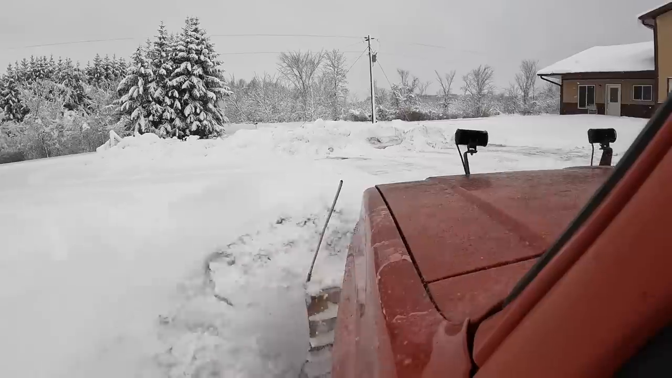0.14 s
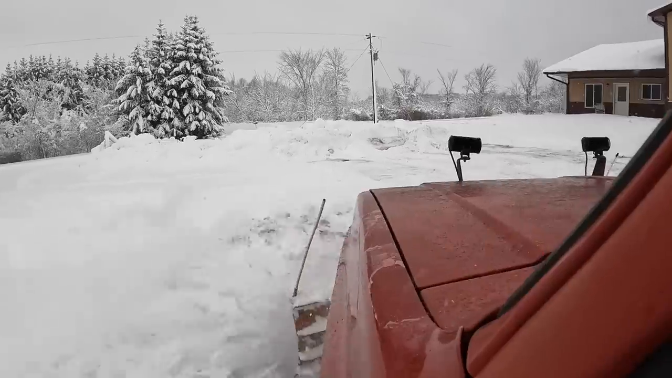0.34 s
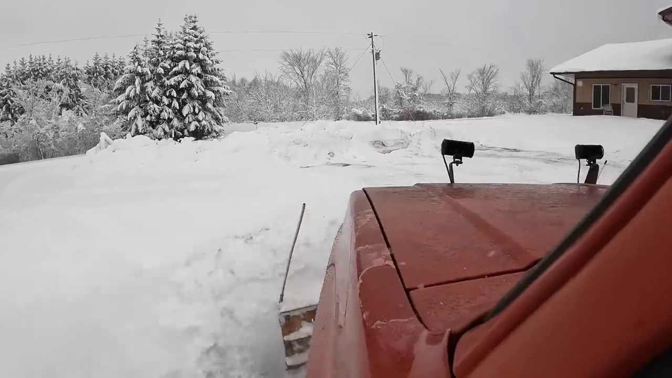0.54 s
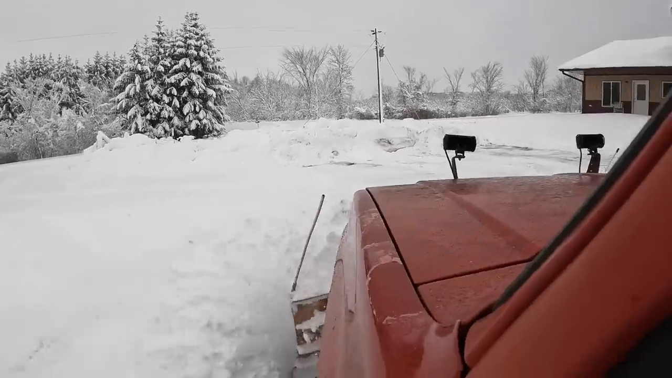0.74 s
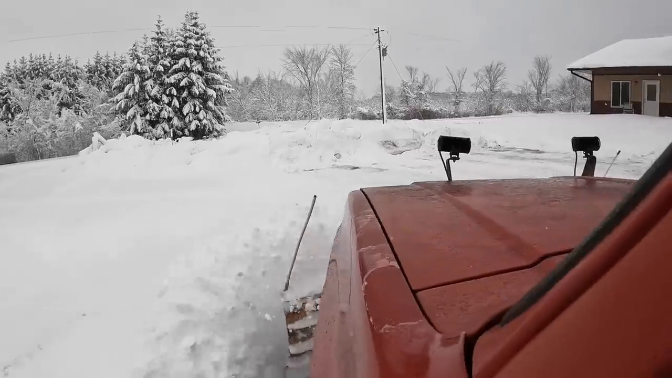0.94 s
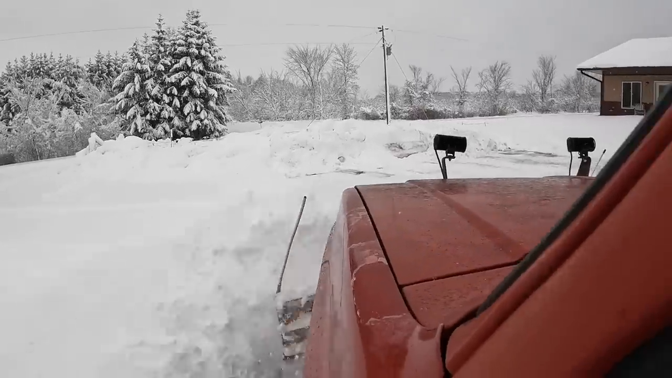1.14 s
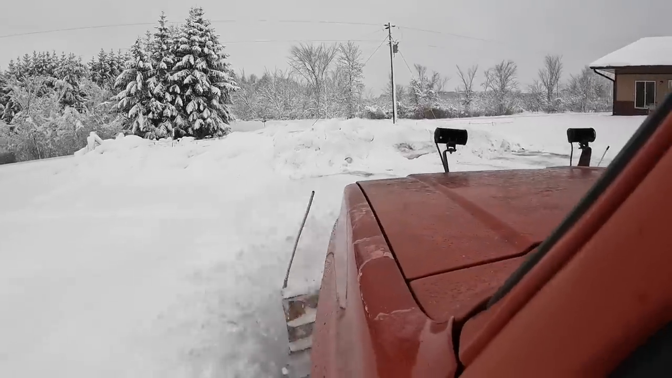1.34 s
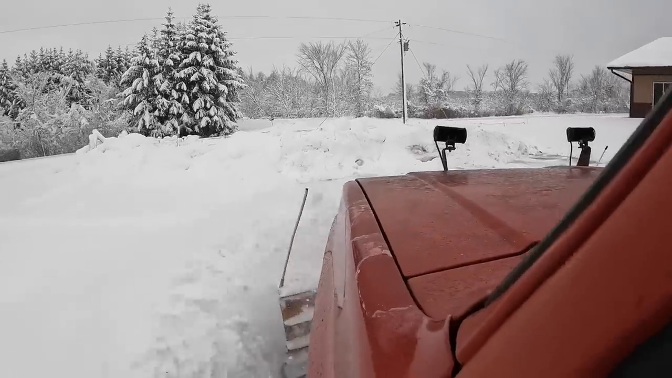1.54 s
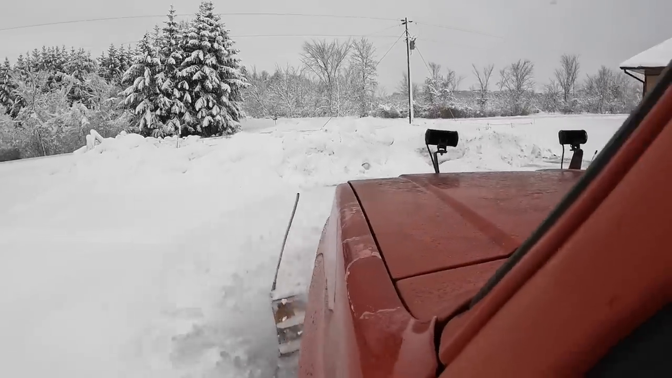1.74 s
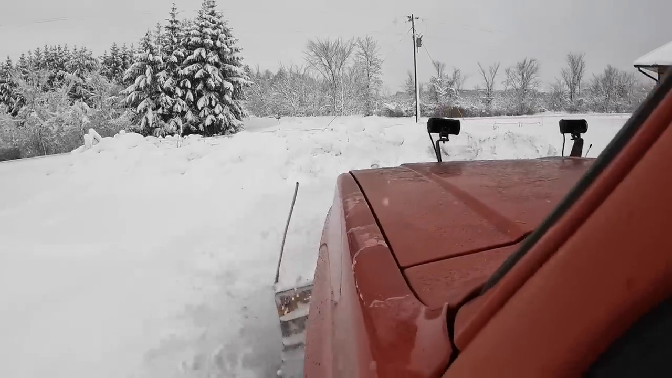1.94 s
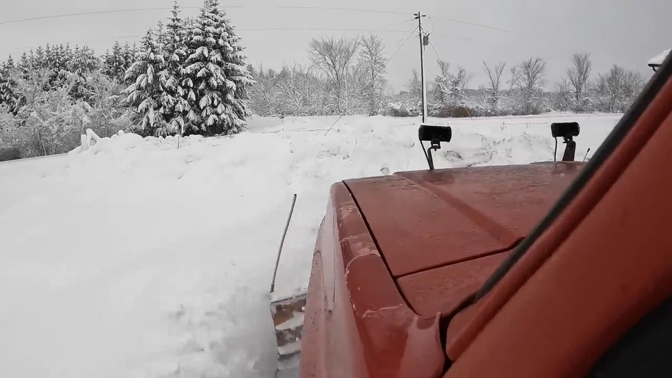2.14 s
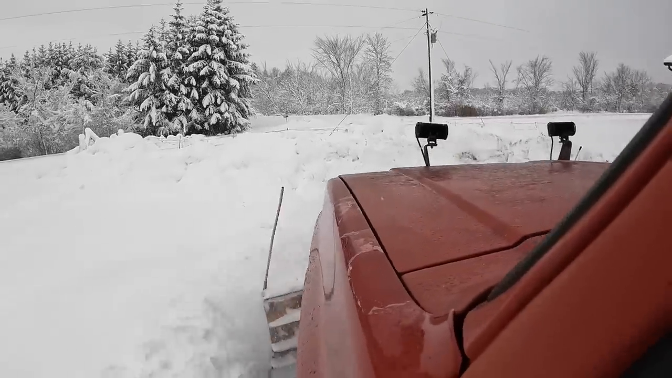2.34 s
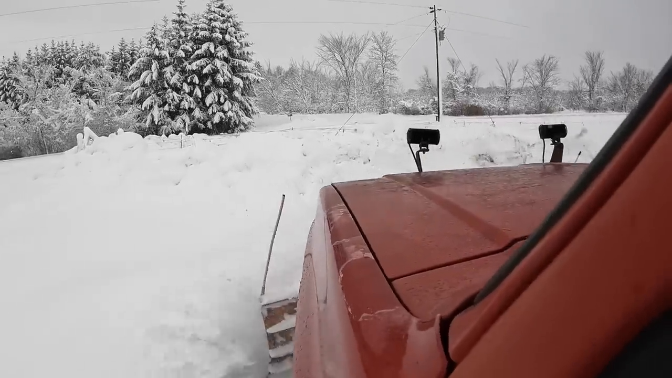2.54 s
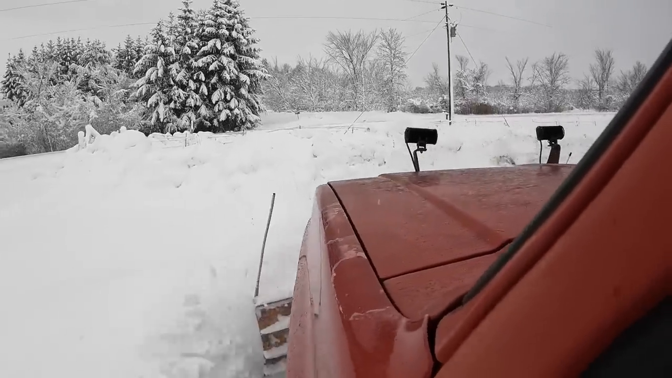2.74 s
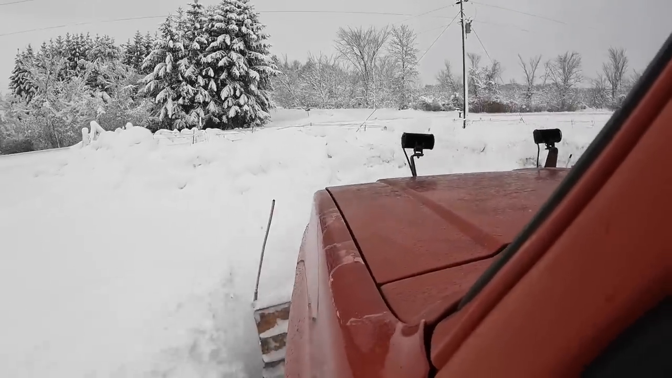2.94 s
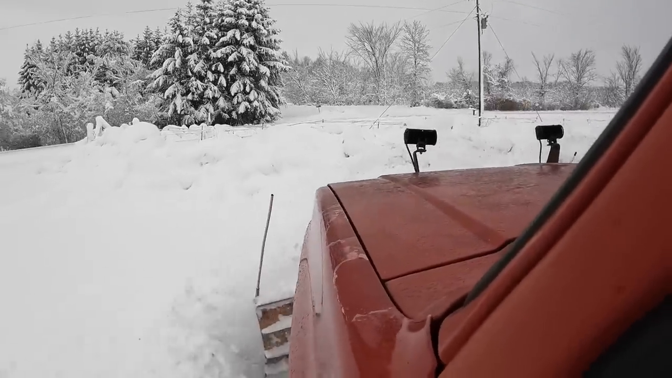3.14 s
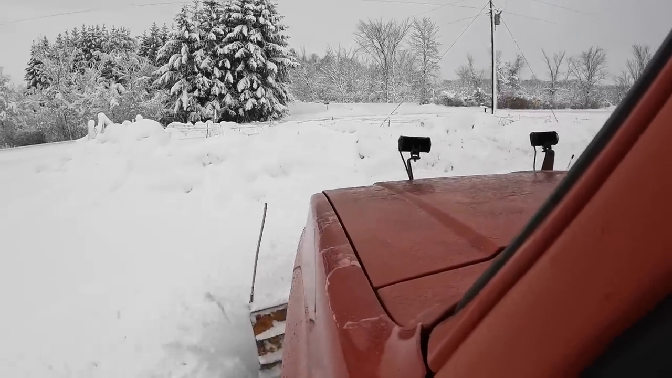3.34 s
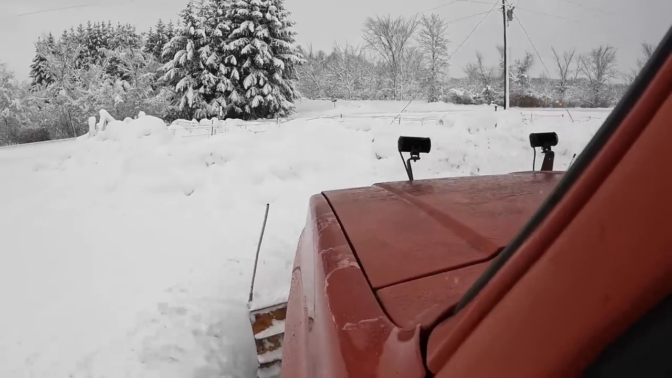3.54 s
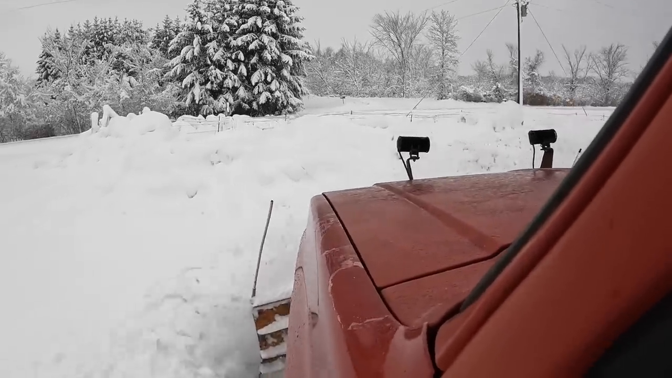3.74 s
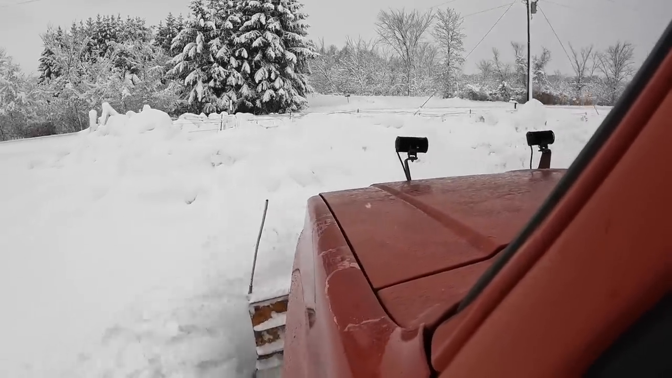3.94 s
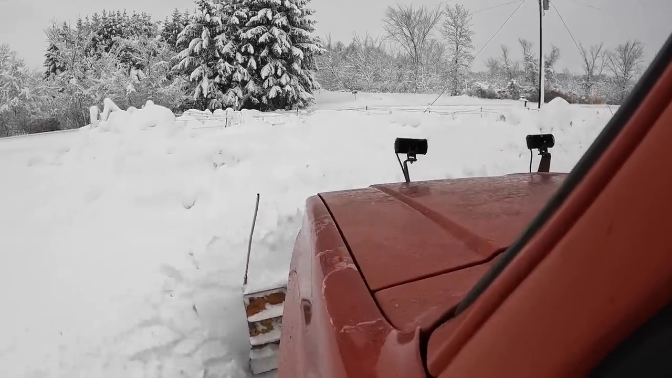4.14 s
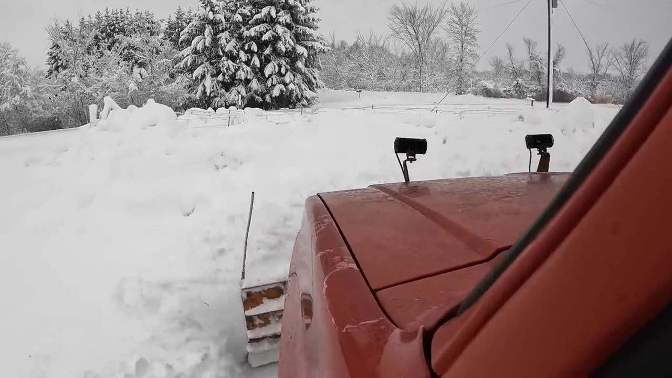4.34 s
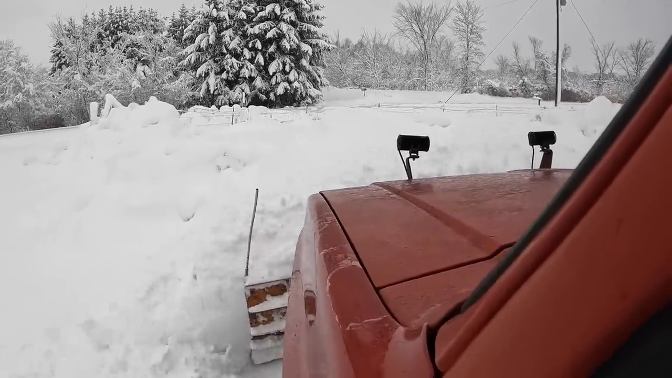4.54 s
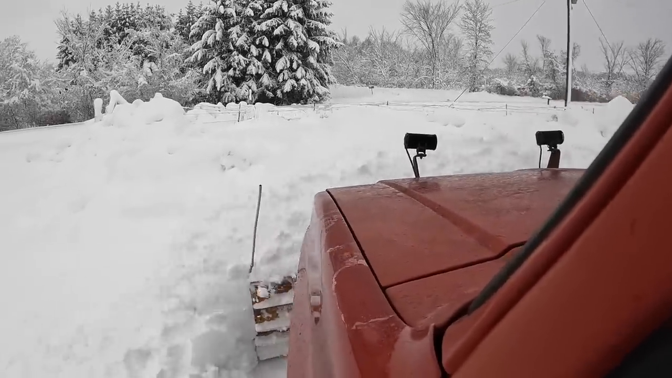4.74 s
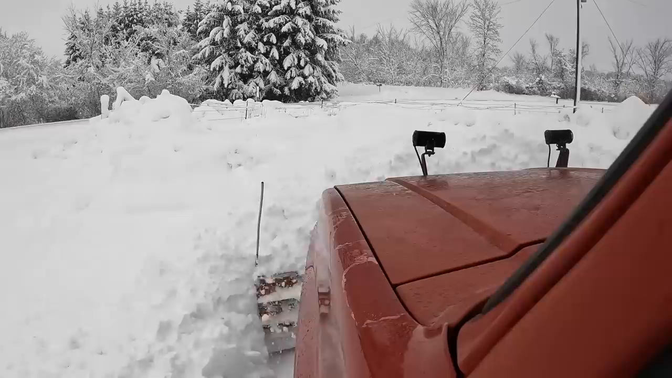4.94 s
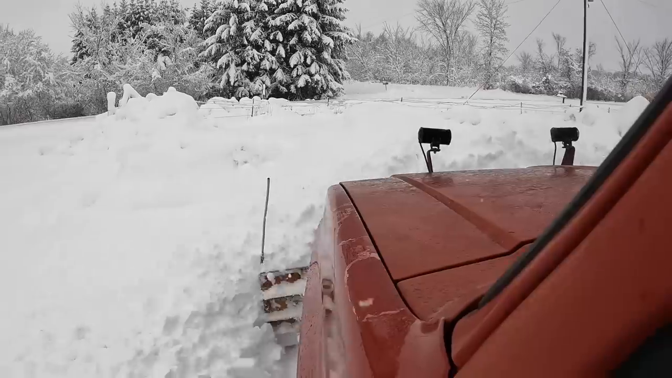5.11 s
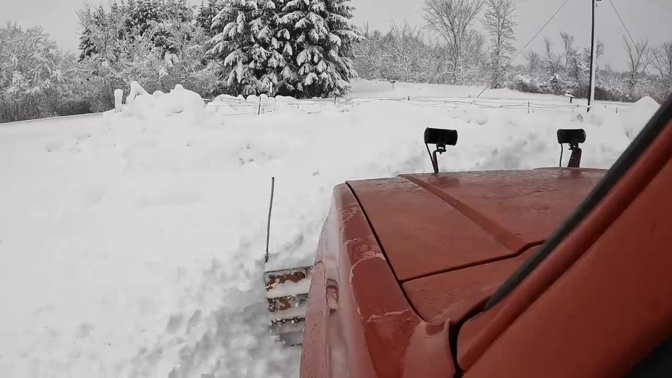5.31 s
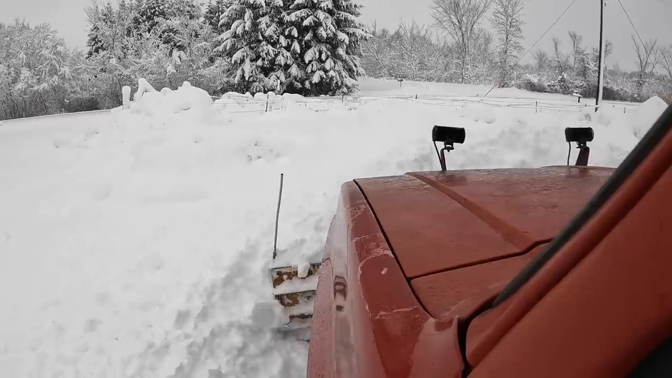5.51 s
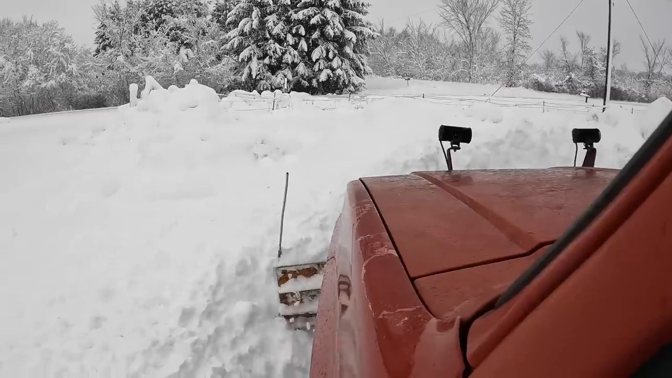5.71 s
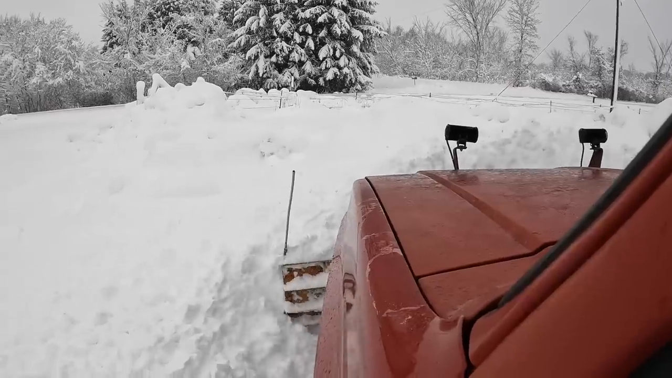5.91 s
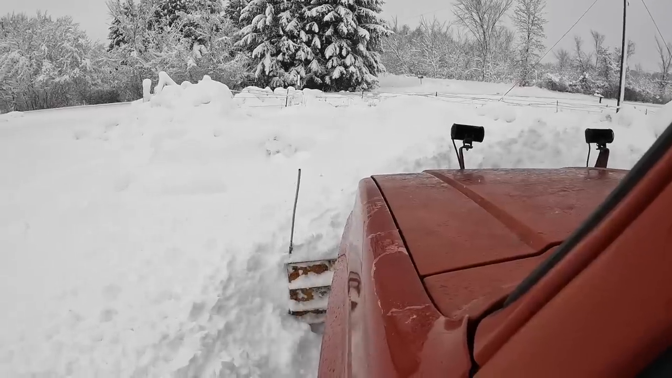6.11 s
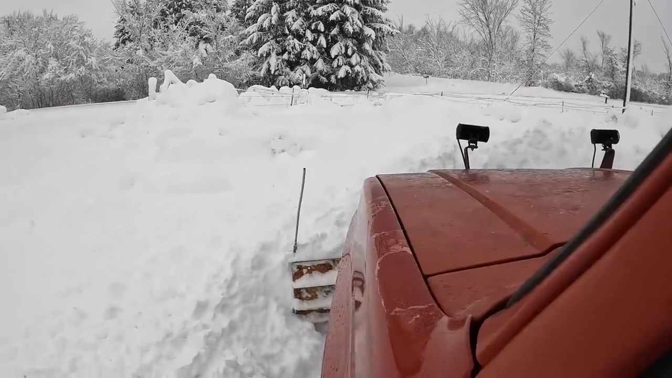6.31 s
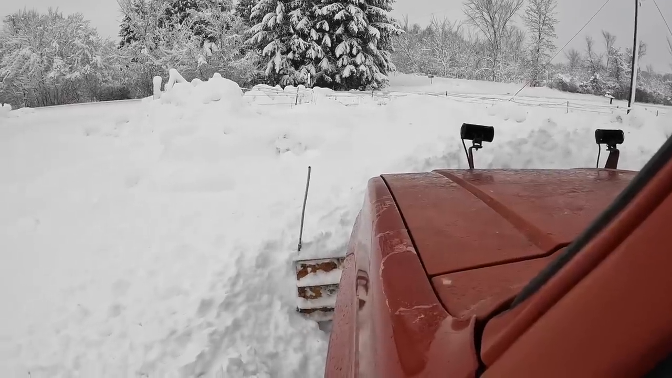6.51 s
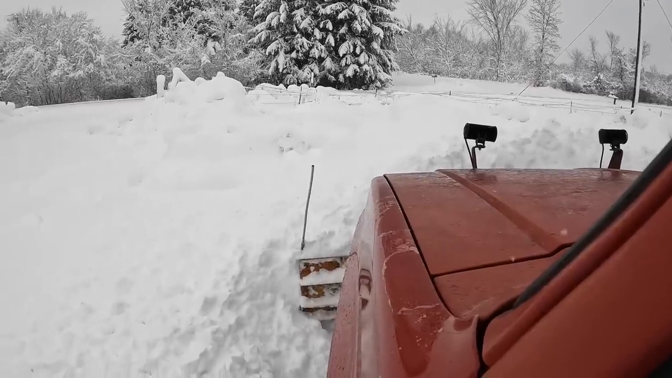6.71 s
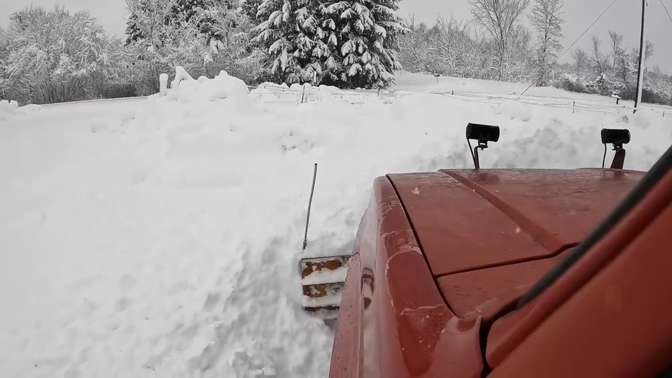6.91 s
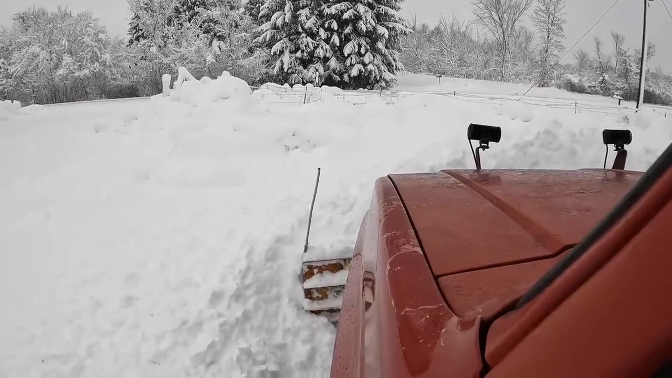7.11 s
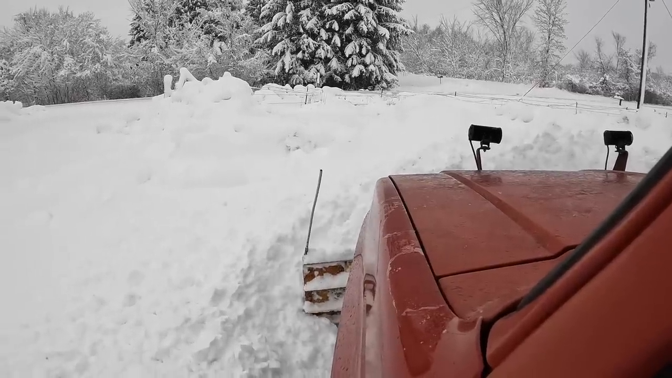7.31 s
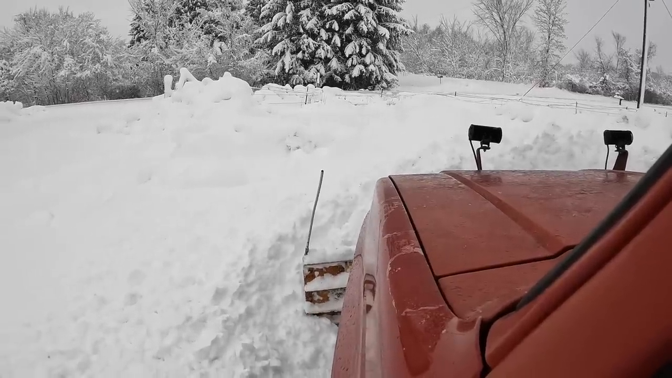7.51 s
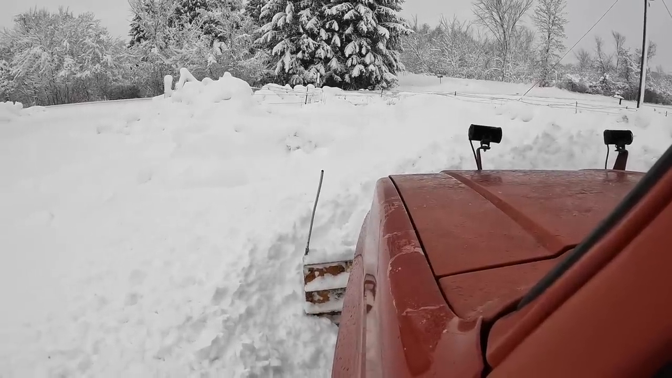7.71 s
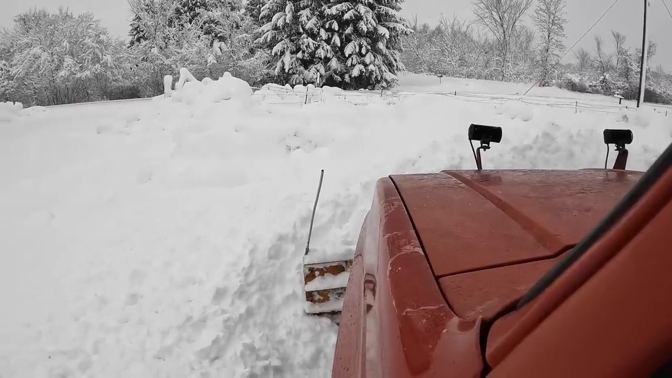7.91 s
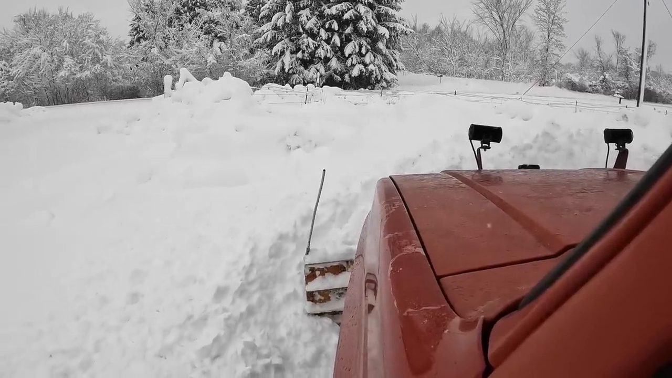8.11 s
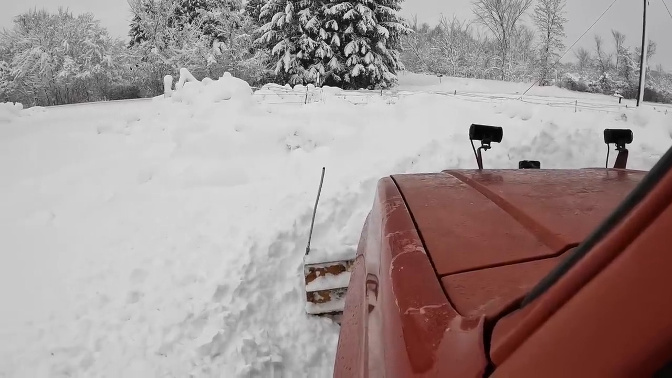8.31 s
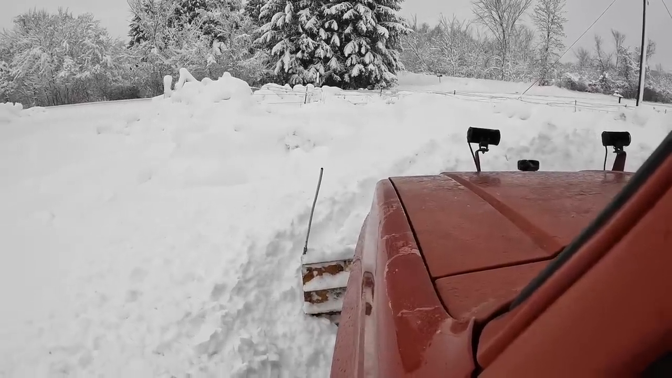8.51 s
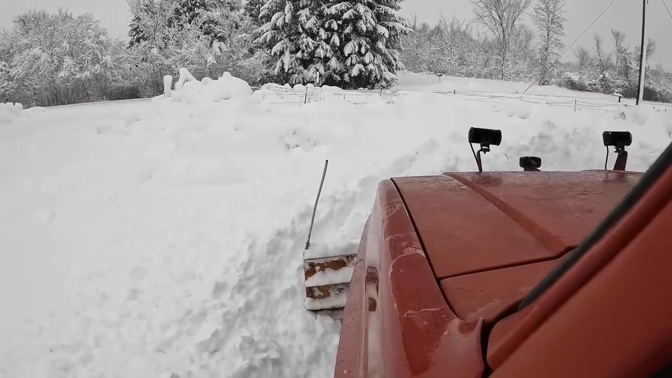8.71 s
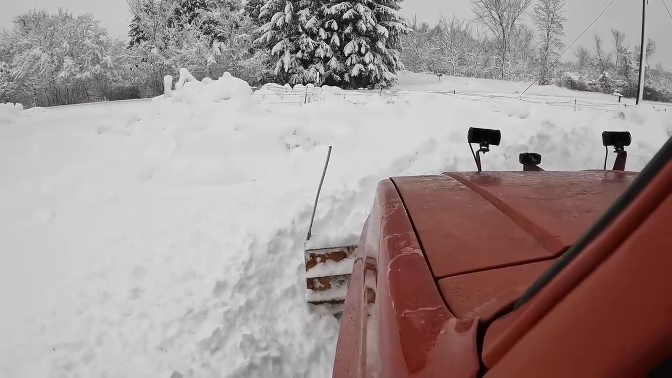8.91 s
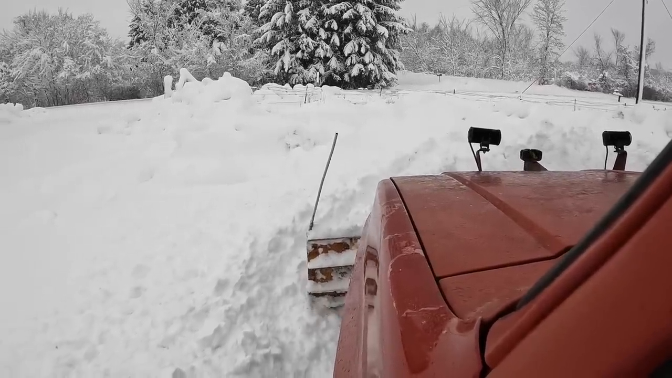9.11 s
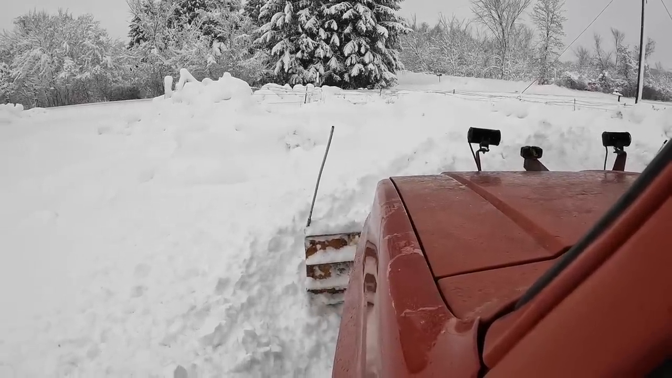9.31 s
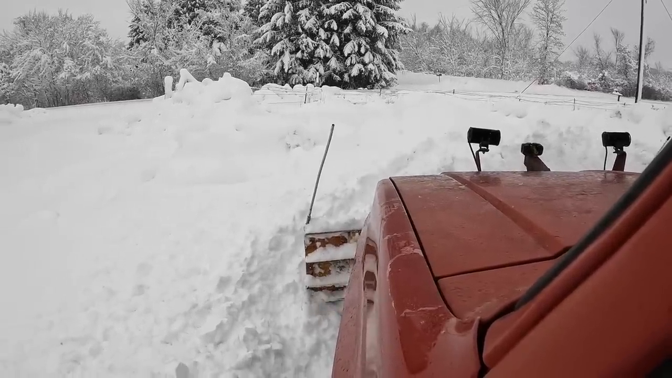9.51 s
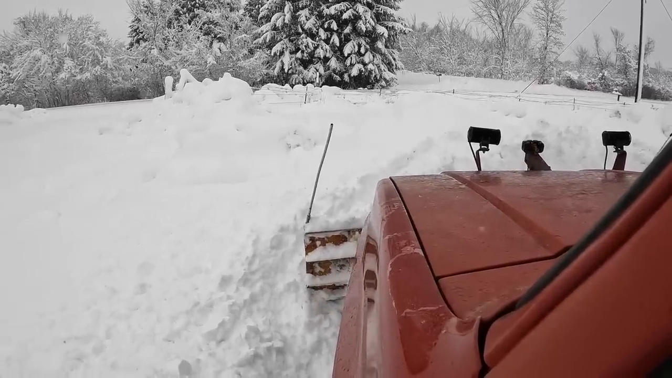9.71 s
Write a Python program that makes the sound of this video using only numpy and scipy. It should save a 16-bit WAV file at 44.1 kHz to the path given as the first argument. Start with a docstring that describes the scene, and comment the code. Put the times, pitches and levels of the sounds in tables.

```python
"""A pickup with an eight-cylinder engine shoves a plow blade through snow, heard from the side of the cab.
It pulls at speed: tones at multiples of the engine cycle over noise puffs; filtered noise rumbles and hisses
as snow on the blade, noise bursts through steel modes clank, and short ringing taps tick as a loose pin.
It slows to idle against the heap as the blade shudders, then stands and revs again with a gusty hiss.
The sound is almost mono and band-limited; late on the stereo widens and leans right."""
import sys
import numpy as np
from scipy import signal
from scipy.fft import rfft, irfft, next_fast_len
from scipy.io import wavfile
from scipy.ndimage import uniform_filter1d

SR = 44100
rng = np.random.default_rng(int(sys.argv[2]) if len(sys.argv) > 2 else 0)


def to_wav(s):
    """Save 16-bit WAV."""
    ch = np.atleast_2d(s).T  # columns
    pcm = np.round(np.clip(ch, -1, 1) * 32767)  # PCM
    wavfile.write(sys.argv[1], SR, pcm.astype(np.int16))


N = 429975
T = np.arange(N) / SR

# engine and hiss over time: time_s, firing_rate_hz, firing_tone_db, hiss_db [rms]
DRIVE = [(0.0, 121.6, -15, -49.5), (0.597, 121.7, -15.5, -48), (0.77, 127.6, -18, -38.5),
         (0.951, 122.3, -17, -43), (2.02, 123.1, -16, -47.5), (2.221, 114, -16, -48),
         (2.498, 112.5, -19, -49), (2.68, 110.1, -16, -51.5), (3.337, 106.1, -18.5, -40.5),
         (3.398, 98.8, -24, -42), (3.732, 95.25, -23, -47.5), (4.02, 88.66, -22.5, -46.5),
         (4.24, 78.5, -24.5, -46.5), (4.5, 64.6, -24, -43.5), (4.719, 53.76, -23.5, -51),
         (4.979, 50.4, -20, -54), (5.3, 48.76, -22.5, -57), (5.868, 46.68, -21.5, -64),
         (6.491, 44.72, -21, -62.5), (6.841, 49.92, -22, -66.5), (7.299, 41.7, -24.5, -66.5),
         (7.718, 41.56, -21, -62.5), (7.898, 46.8, -18.5, -59), (8.038, 57, -19, -51),
         (8.2, 70.1, -16, -48.5), (8.42, 88.55, -18.5, -44.5), (8.581, 99.4, -16.5, -43.5),
         (8.801, 109.7, -15.5, -48), (9.001, 117.5, -15, -50), (9.23, 122.2, -16.5, -58),
         (9.75, 115.9, -17, -59.5)]

# exhaust
# lope tones beside the firing tone: cycle_multiple, idle_db, speed_db [relative]
LOPE_TONES = [(2, -35, -24), (3, -28, -24), (5, -12, -7), (6, -23, -25), (7, -24, -21), (10, -22, -10),
              (11, -8, -8.5), (12, -24, -17), (13, -16, -9.5), (14, -13, -19), (15, -23, -10),
              (16, -10, -16), (17, -15, -21), (18, -17, -17), (19, -26, -21), (21, -24, -27),
              (22, -22, -28), (23, -26, -26), (24, -11, -28), (27, -21, -27), (32, -24, -36),
              (35, -20, -36), (40, -25, -38), (43, -28, -38)]
# uneven bank at the near tail pipe, in firing order: pulse_share; sets only the tone phases
CYLINDER_SHARES = [1, .55, .3, .9, .2, .5, .2, .65]
# tail pipe and muffler; tones lag by half a turn across each: center_hz, half_width_hz
PIPES = [(103.5, 5), (130, 32)]
IDLE_HZ, SPEED_HZ = 52.7, 122.3  # firing rates at which the idle and speed values hold
TONE_DB, LOPE_PER_DB = -17, 0.35  # the lope swells a little with the firing tone
LOPE_DB = -19.5, -17.5  # at idle, at speed, with the firing tone at TONE_DB
STRAINED_LOPE_DB = -1
# overtones of the firing tone boom as they cross this pitch, more as the engine gains speed
BOOM_HZ, BOOM_WIDTH_HZ, BOOM_DB = 105, 12.8, 7
BOOM_DB_PER_HZ_PER_S = 0.041
# firing grows uneven in level and pace as the blade digs in, and at low revs
STUMBLE_DB, STUMBLE_SHARE = 2, .008
IDLE_WAVER_DB, IDLE_WAVER_SHARE = 1.5, .008

# exhaust gas noise: freq_hz, density_db [relative, per Hz]
ROAR_SPECTRUM = [(120, -20), (190, -6), (250, -7), (330, -12), (450, -12), (600, -13), (800, -15),
                 (1150, -17), (1400, -21), (1700, -28), (2400, -30), (4300, -37), (7300, -39), (8500, -54),
                 (12000, -62), (15000, -85)]
ROAR_DB = -43, -33  # rms before the top is cut: at idle, at speed
ROAR_TOP_DB = -12.5, -21, -1.5  # gain above 4.5 kHz: at idle, pushing, revving at a stand

# rolling snow: freq_hz, density_db [relative, per Hz]
ROLL_SPECTRUM = [(15, -6), (60, -7), (100, -7), (190, -4), (250, -5), (330, -9), (600, -14), (1100, -25),
                 (1600, -45), (3000, -110)]
# chassis lurch: freq_hz, density_db [relative, per Hz]
LURCH_SPECTRUM = [(8, -15), (20, 7), (35, 24), (55, 17.5), (90, -72.5)]
# blade digging in, then leaning on the heap: time_s, shudder_db [rms before flutter]
SHUDDER = [(2.9, -30), (3.2, -35.5), (3.6, -26.5), (4.1, -22), (4.5, -28), (5.0, -31), (5.6, -35),
           (7.8, -33.5), (8.3, -64.5)]
# blade resonances, passed twice: center_hz, width_hz, gain_db [per pass, relative]
BLADE_MODES = [(168.1, 11, 2.5), (198.3, 18, 2.5), (228.2, 14, -1)]
# the rumble follows the hiss, less steeply
ROLL_DB, ROLL_AT_HISS_DB, ROLL_PER_DB = -27, -47, 0.59
LURCH_DB, LURCH_SWING_DB, LURCH_PER_DB = -35, 2.5, .5  # the lurch follows the hiss too
DIG_FROM_DB, DIG_LURCH_PER_DB = -34, .6  # lurch grows once the shudder is louder than this
STRAIN_RANGE_DB = 6  # shudder rise above DIG_FROM_DB that means full strain
STOP_S, SETTLE_S = 7.39, 0.8  # the truck comes to stand and revs without pushing
STANDING_ROLL_DB, STANDING_LURCH_DB = -2, 6

# hiss, of snow on the blade and later at a stand: freq_hz, density_db [relative, per Hz]
HISS_SPECTRUM = [(710, -31.5), (1200, -7), (1480, 1), (2300, 2.5), (2650, 0.5), (4180, -5.5), (9620, -28.5),
                 (11600, -37.5), (13200, -55), (15000, -62.5)]

# jolts: start_s, level_db [middle part, rms of first 40 ms], low_db and treble_db [over level_db],
# spot_hz, second_spot_hz, t60_s [before HASTE]
CLANKS = [(0.12, -51.5, 3, -21, 970, 2440, .2), (0.588, -44.5, 7, -12, 4050, 4100, 0.18),
          (0.774, -35, 10.5, -31, 4100, 2600, 0.23), (1.064, -44, -8, -27, 3360, 4100, 0.19),
          (1.128, -44, 8, -29, 4130, 3000, 0.086), (1.293, -53.5, 20, -26, 4100, 2900, 0.18),
          (1.315, -48.5, 10, -31, 4100, 3391, 0.12), (1.517, -43, 15, -35, 4160, 4900, 0.14),
          (1.94, -38.5, 12, -18, 4150, 2530, 0.26), (1.957, -44, 12, -17, 970, 2490, 0.34),
          (2.008, -46, -6, -31, 4500, 2120, 0.12), (2.2, -47.5, -5, -34, 4280, 2970, 0.048),
          (2.32, -42, -11, -29, 2280, 4600, 0.23), (2.345, -41, -17, -27, 2300, 3300, 0.18),
          (2.753, -47.5, -7, -24, 2285, 1600, 0.11), (2.85, -59, 0, -26, 1980, 2500, 0.14),
          (3.101, -46.5, 14, -26, 563, 4370, 0.2), (3.13, -50, -6, -29, 1948, 4507, .12),
          (3.245, -42.5, -8, -33, 2270, 3513, 0.16), (3.34, -47, 16, -39, 784.3, 2600, 0.11),
          (3.555, -53.5, 22, -29, 565, 2300, 0.17), (4.308, -44, 11, -28, 560, 2230, 0.15),
          (4.421, -40, 5, -37, 2759, 761.6, 0.055), (4.445, -36.5, -11, -33, 4260, 1410, 0.17),
          (4.499, -33.5, -14, -22, 4387, 1511, 0.13), (4.816, -38, -14, -18, 4684, 1620, 0.19),
          (4.824, -38, -1, -29, 2630, 1640, 0.22), (4.986, -40, 12, -24, 556.3, 3200, 0.16),
          (5.14, -51, 7, -32, 2660, 4100, .2), (5.225, -44.5, 14, -13, 945, 3740, 0.22),
          (5.335, -36, 10, -19, 2934, 4100, 0.079), (5.344, -27, -4, -15, 4620, 766, 0.22),
          (5.362, -24.5, 0.5, -15.5, 3480, 2320, 0.33), (5.378, -26.5, -5, -27, 4670, 2150, 0.15),
          (5.4, -38, 4, -47, 3510, 950, 0.25), (5.466, -43.5, 2, -20, 3150, 5300, 0.12),
          (5.655, -44, -1, -37, 2446, 1830, 0.22), (5.669, -50, 12.5, -40, 945, 4840, 0.095),
          (6.098, -52, 11.5, -10, 2247, 1156, .15), (6.111, -56, 2, -25, 2002, 2390, 0.13),
          (6.174, -54, 14, -6, 776, 2258, 0.21), (6.258, -56.5, 12, -3, 550, 2900, 0.24),
          (6.4, -58.5, 10, -0.5, 1185, 2870, .2), (7.672, -49.5, 15.5, -16, 545, 2870, 0.21),
          (7.955, -54, 16.5, -14, 2230, 3702, 0.11), (8.099, -56, 20.5, -22, 2260, 2250, 0.17),
          (8.22, -48, -1, -18, 3400, 2250, 0.21), (8.325, -47.5, 6, -10, 3510, 4200, 0.19),
          (8.354, -53.5, 12, -7, 4205, 6100, 0.078), (8.394, -58, -13, 0, 4470, 6100, 0.082),
          (8.416, -37.5, 8, -18, 1935, 1935, 0.11), (8.433, -37, 7.5, -12, 790, 950, 0.21),
          (8.467, -44, -6, -15, 2530, 3800, 0.13), (8.57, -43.5, -2, -7, 2945, 2300, .25),
          (8.588, -40.5, 1, -21, 2300, 4600, 0.066)]
# plow frame steel, nominal: center_hz, width_hz [one pass], gain_db [relative]
FRAME_MODES = [(560, 120, 8), (770, 150, 3), (945, 36, 5), (1200, 130, -1), (1420, 200, 0), (1620, 200, 0),
               (1930, 150, 0), (2280, 320, 0), (2620, 280, 0), (2980, 280, -1), (3480, 300, -2),
               (4130, 450, -6), (4600, 450, -8), (5300, 400, -13), (6100, 400, -17)]
# broad colour of a clank: freq_hz, density_db [relative, per Hz]
STEEL_SPECTRUM = [(150, -27.5), (280, 2.5), (700, -7), (1300, -9), (2300, -10), (4700, -18), (6300, -27),
                  (8000, -34), (10800, -46), (12200, -35.5), (15000, -59.5)]
# filters for the low, middle and top part of a clank, each: freq_hz, gain_db
CLANK_PARTS = ([(1300, 0), (1600, -40)], [(1050, -40), (1350, 0), (6500, 0), (8000, -30)], [(6000, -30),
               (7000, 0), (9500, -8), (13000, -6), (15000, -30)])
RING_DB = 1.5  # modes over the broad colour
SPOT_DB, SCATTER_DB, DETUNE_SHARE = 10, 3, .025  # lift near a spot; chance spreads per jolt
CLANK_RISE_S = .003
CLATTER_FROM_DB, CLATTER_PER_DB = -36, .3  # harder jolts clatter more and ring less
HASTE = 0, .35, 0.47  # extra decay rate of the low, middle and top part, as a share

# pin taps: start_s, strike_db [relative, before the pin rings]
TICKS = [(0.038, -29.5), (0.4079, -24), (0.7757, -29), (1.8444, -28), (2.043, -23.5), (2.3035, -27),
         (2.323, -28), (2.364, -29), (2.5254, -33), (3.231, -28), (3.4078, -26.5), (3.5294, -28.5),
         (3.753, -26), (7.1664, -36), (8.749, -30.5), (8.8853, -31)]
# pin resonances, nominal: center_hz, width_hz, gain_db [relative]
PIN_MODES = [(2340, 240, 0), (4600, 500, -13), (7400, 800, -19)]

# faint top hiss: freq_hz, density_db [relative, per Hz]
AIR_SPECTRUM = [(8000, -39), (10500, -9.5), (12000, -1.5), (13500, -10.5), (15000, -30.5)]
AIR_DB = -87, -82  # rms before and after the stop

# stereo side fully open: freq_hz, side_db [relative to mid, before SIDE_GAIN_DB]
SIDE_SPECTRUM = [(60, -86), (150, -29.5), (380, -21.5), (950, -17), (2380, -13.5), (5980, -17),
                 (15000, -9.5)]
# the stereo widens late: time_s, open_share
OPENING = [(6.9, 0.0038), (7.4, 0.13), (8, 0.31), (8.4, 0.75), (9.75, 1)]
SIDE_GAIN_DB = 5.5
EDGE_HZ = 15700


def gain_of(db):
    """Decibels to gain."""
    return 10 ** (np.asarray(db) / 20)


def evened(x):
    """Scales to rms 1."""
    return x / np.sqrt(np.mean(x ** 2) + 1e-20)


def read(points, hz):
    """Reads a spectrum on a log frequency axis."""
    f, value = np.transpose(points)
    return np.interp(np.log(hz + 1), np.log(f + 1), value)


def over_time(points):
    """A two-column time table, sample by sample."""
    return np.interp(T, *np.transpose(points))


def control(column):
    """One column of the drive table, sample by sample."""
    rows = np.array(DRIVE)
    return np.interp(T, rows[:, 0], rows[:, column])


def add(mix, start_s, sound):
    """Mixes a sound in at start_s."""
    part = mix[round(start_s * SR):][:len(sound)]
    part += sound[:len(part)]


def drift(rate_hz):
    """Smooth slow chance of rms 1: low-passed noise computed at 200 Hz."""
    steps = int(N / SR * 200) + 2
    x = signal.lfilter(*signal.butter(2, rate_hz, fs=200), rng.standard_normal(steps))
    return np.interp(T * 200, np.arange(steps), evened(x))


def colour(x, points):
    """Filters by a spectrum."""
    size = next_fast_len(len(x))
    gain = gain_of(read(points, np.fft.rfftfreq(size, 1 / SR)))
    return irfft(rfft(x, size) * gain, size)[:len(x)]


def decaying(x, tau_s):
    """Gives every impulse in x an exponential tail."""
    return signal.lfilter([1], [1, -np.exp(-1 / (tau_s * SR))], x)


def ring(x, modes, order=1):
    """Passes x through parallel resonances of given peak gain; a higher order has steeper flanks."""
    out = np.zeros(len(x))
    for hz, width_hz, db in modes:
        r, y = np.exp(-np.pi * width_hz / SR), x
        for _ in range(order):
            y = signal.lfilter([1 - r], [1, -r * np.exp(2j * np.pi * hz / SR)], y)
        out += gain_of(db) * 2 * y.real
    return out


def speed():
    """0 at idle, 1 at speed."""
    return np.clip((control(column=1) - IDLE_HZ) / (SPEED_HZ - IDLE_HZ), 0, 1)


def standing():
    """0 while the truck pushes, 1 once it stands."""
    return np.clip((T - STOP_S) / SETTLE_S, 0, 1)


def strain():
    """0 running free, 1 with the blade dug in."""
    return np.clip((over_time(SHUDDER) - DIG_FROM_DB) / STRAIN_RANGE_DB, 0, 1)


def pipe_lag(tone_hz):
    """Phase of a tone after the pipe resonances, each turning it by up to half a turn."""
    return sum(-np.pi / 2 - np.arctan((tone_hz - hz) / width_hz) for hz, width_hz in PIPES)


def exhaust():
    """The firing tone and the lope; no two firings are quite alike, so every tone wavers a little."""
    count = len(CYLINDER_SHARES)
    firing_hz, tone_db = control(column=1), control(column=2)
    cycle_hz = firing_hz / count
    revs, load = speed(), strain()
    uneven_share = STUMBLE_SHARE * load + IDLE_WAVER_SHARE * (1 - revs)
    pace = 1 + .002 * drift(rate_hz=4) + uneven_share * drift(rate_hz=8)
    cycle = 2 * np.pi * np.cumsum(cycle_hz * pace) / SR
    timing = np.angle(np.fft.fft(CYLINDER_SHARES))  # uneven pulses set how the tones line up

    gaining_hz_per_s = np.maximum(np.gradient(firing_hz, T), 0)
    boom_db = BOOM_DB + BOOM_DB_PER_HZ_PER_S * uniform_filter1d(gaining_hz_per_s, size=4000)
    waver_db = .6 + STUMBLE_DB * load + IDLE_WAVER_DB * (1 - revs)
    waver_rad = .15 + .35 * (1 - revs)
    lope = 0
    for k, idle_db, speed_db in np.array(LOPE_TONES):
        k = round(k)
        db = idle_db + revs * (speed_db - idle_db) + waver_db * drift(rate_hz=4)
        if k % count == 0:
            db = db + boom_db * np.exp(-((k * cycle_hz - BOOM_HZ) / BOOM_WIDTH_HZ) ** 2)
        phase = k * cycle + timing[k % count] + pipe_lag(k * cycle_hz) + waver_rad * drift(rate_hz=5)
        lope = lope + gain_of(db) * np.cos(phase)
    lope_db = LOPE_DB[0] + revs * (LOPE_DB[1] - LOPE_DB[0])
    lope_db = lope_db + LOPE_PER_DB * (tone_db - TONE_DB) + STRAINED_LOPE_DB * load

    tone_db = tone_db + .8 * drift(rate_hz=21) + STUMBLE_DB * load * drift(rate_hz=20)
    tone = gain_of(tone_db) * np.cos(count * cycle + pipe_lag(firing_hz))
    return np.sqrt(2) * (tone + gain_of(lope_db) * lope), cycle


def roar(cycle):
    """Gas rushes out in a puff at each firing, louder with speed; brightest when the engine revs at a stand."""
    puffs = 1 + 0.13 * np.cos(len(CYLINDER_SHARES) * cycle) + 0.22 * np.cos(cycle)
    noise = evened(colour(puffs * rng.standard_normal(N), ROAR_SPECTRUM))
    top = signal.sosfiltfilt(signal.butter(2, 4500, "high", fs=SR, output="sos"), noise)
    idle_db, pushing_db, free_db = ROAR_TOP_DB
    revving_db = pushing_db + standing() * (free_db - pushing_db)
    noise = noise - top + top * gain_of(idle_db + speed() * (revving_db - idle_db))
    level_db = ROAR_DB[0] + speed() * (ROAR_DB[1] - ROAR_DB[0]) + 0.49 * drift(rate_hz=5.2)
    return gain_of(level_db) * noise


def rumble():
    """The chassis lurches, snow rolls off the blade in lumps, and the blade shudders as it digs in."""
    flow_db = control(column=3) - ROLL_AT_HISS_DB
    dig_db = over_time(SHUDDER)
    lurch_db = LURCH_DB + LURCH_PER_DB * flow_db + STANDING_LURCH_DB * standing()
    lurch_db += LURCH_SWING_DB * drift(rate_hz=2.6)
    lurch_db += DIG_LURCH_PER_DB * np.maximum(dig_db - DIG_FROM_DB, 0)
    lurch = gain_of(lurch_db) * evened(colour(rng.standard_normal(N), LURCH_SPECTRUM))

    lumps = (rng.random(N) < 14 / SR) * rng.exponential(1, N)  # 14 a second
    lumps = 1 + (.3 + .6 * strain()) * decaying(lumps, tau_s=.025)
    roll_db = ROLL_DB + ROLL_PER_DB * flow_db + STANDING_ROLL_DB * standing() + 0.86 * drift(rate_hz=4.0)
    roll = gain_of(roll_db) * evened(colour(lumps * rng.standard_normal(N), ROLL_SPECTRUM))

    blade = evened(ring(ring(rng.standard_normal(N), BLADE_MODES), BLADE_MODES))
    shudder = gain_of(dig_db + 2.0 * drift(rate_hz=8)) * blade
    return lurch + roll + shudder


def hiss():
    """Hiss of snow on the blade with small crunches, and later a gusty hiss as the engine revs at a stand."""
    crunch_db = 3.0 * np.minimum(rng.exponential(1, N), 3)
    crunch = (rng.random(N) < 250 / SR) * gain_of(crunch_db)  # 250 a second
    crunch = decaying(crunch, tau_s=.004)
    noise = evened(colour((1 + 0.23 * crunch) * rng.standard_normal(N), HISS_SPECTRUM))
    return gain_of(control(column=3) + 3.04 * drift(rate_hz=2.36)) * noise


def nearness(hz, spots_hz):
    """1 at a struck spot's pitch, falling to 0 away from it."""
    return max(np.exp(-(np.log(hz / spot_hz) / .07) ** 2) for spot_hz in spots_hz)


def clanks():
    """Each jolt is a quick rattle of blows; the modes near the struck spots ring most, the others by chance."""
    out, t = np.zeros(N), np.arange(SR // 4) / SR
    for start_s, level_db, low_db, treble_db, spot_hz, second_spot_hz, t60_s in CLANKS:
        t60_s = max(t60_s, .02)
        fade = gain_of(-60 * t / t60_s) * (1 - np.exp(-t / CLANK_RISE_S))
        blows = decaying(rng.standard_normal(len(t)) > 2.6, tau_s=.002)  # about 200 a second
        rattle = rng.standard_normal(len(t)) * fade * (1 + 1.1 * blows)
        modes = []
        for hz, width_hz, db in FRAME_MODES:
            db = db + SCATTER_DB * rng.standard_normal() + SPOT_DB * nearness(hz, (spot_hz, second_spot_hz))
            modes.append((hz * (1 + DETUNE_SHARE * rng.standard_normal()), width_hz, db))
        ring_db = RING_DB - CLATTER_PER_DB * max(level_db - CLATTER_FROM_DB, 0)
        ringing = gain_of(ring_db) * evened(ring(rattle, modes, order=2))
        body = evened(colour(rattle, STEEL_SPECTRUM)) + ringing
        for part, part_db, haste in zip(CLANK_PARTS, (low_db, 0, treble_db), HASTE):
            sound = colour(body, part) * gain_of(-60 * haste * t / t60_s)
            onset_rms = np.std(sound[:round(.04 * SR)])
            add(out, start_s, gain_of(level_db + part_db) * sound / onset_rms)
    return out


def ticks():
    """A loose pin taps and bounces once; the contact lasts a fraction of a millisecond."""
    out, contact = np.zeros(N), np.hanning(7)
    for start_s, strike_db in TICKS:
        delay, loss, pitch, damping = rng.random(4)
        taps = np.zeros(SR // 20)
        add(taps, 0, gain_of(strike_db) * contact)
        add(taps, .002 + .003 * delay, gain_of(strike_db - 6 - 15 * loss) * contact)
        modes = [(hz * (.96 + .08 * pitch), width_hz * (.7 + .6 * damping), db)
                 for hz, width_hz, db in PIN_MODES]
        add(out, start_s, ring(taps, modes))
    return gain_of(18.5) * colour(out, [(1300, -29.0), (1900, 9.0), (8000, -4.0), (10000, -22.0)])


def air():
    """A faint top hiss, unrelated between the channels."""
    level = gain_of(AIR_DB[0] + standing() * (AIR_DB[1] - AIR_DB[0]))
    return np.array([level * evened(colour(x, AIR_SPECTRUM)) for x in rng.standard_normal((2, N))])


def side_of(mid):
    """Phase-scrambled copy of mid, unrelated to it; its share grows late, when mid also leans right."""
    hz, t, z = signal.stft(mid, SR, nperseg=1024)
    share = np.interp(t, *np.transpose(OPENING))
    share = np.maximum(share, (hz > 11000)[:, None])  # the top treble is always wide
    scramble = np.exp(2j * np.pi * rng.random(z.shape))
    z = z * share * gain_of(read(SIDE_SPECTRUM, hz) + SIDE_GAIN_DB)[:, None] * scramble
    unrelated = signal.istft(z, SR, nperseg=1024)[1][:N]
    return unrelated - 0.037 * over_time(OPENING) * mid


def scene():
    """Near mono mix of all sources with a stereo side, and air in each channel."""
    pipe, cycle = exhaust()
    mid = pipe + roar(cycle) + rumble() + hiss() + clanks() + ticks()
    side = side_of(mid)
    return np.array([mid + side, mid - side]) + air()


def record(dry):
    """A soft overload rounds the peaks; then the band limit."""
    soft = .62 * np.tanh(dry / .62)
    lowpass = signal.firwin(511, EDGE_HZ, window=("kaiser", 9), fs=SR)
    return signal.oaconvolve(soft, lowpass[None], "same")


dry = scene()
out = record(dry)
to_wav(out)
```